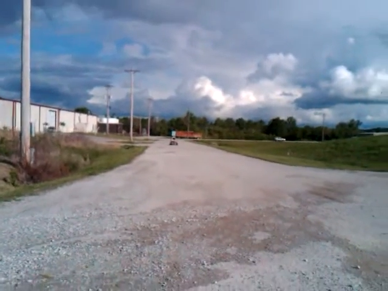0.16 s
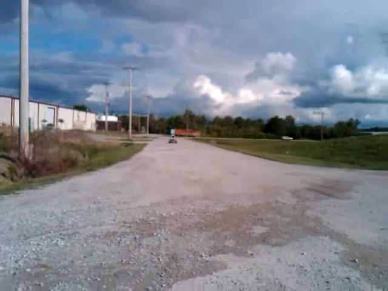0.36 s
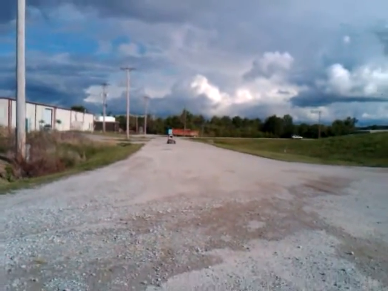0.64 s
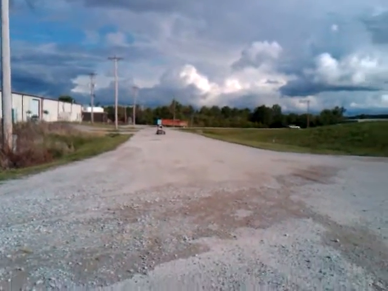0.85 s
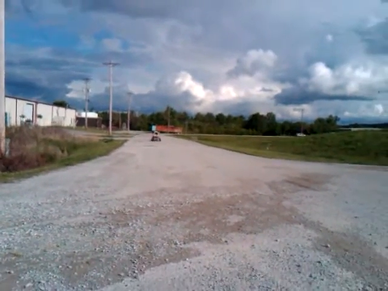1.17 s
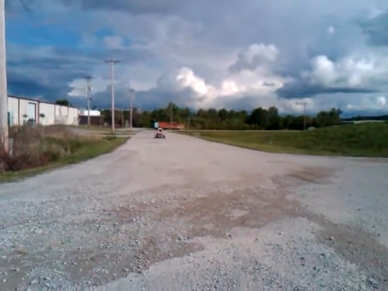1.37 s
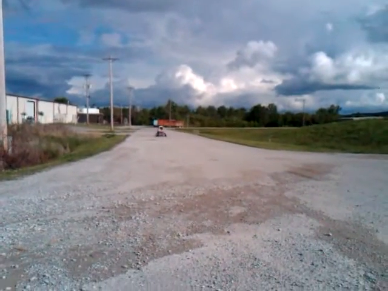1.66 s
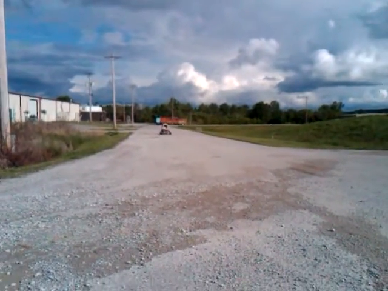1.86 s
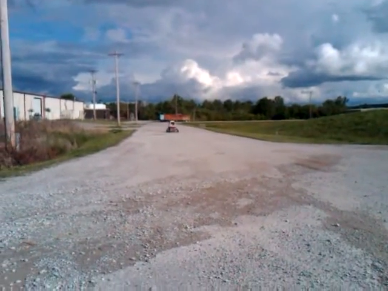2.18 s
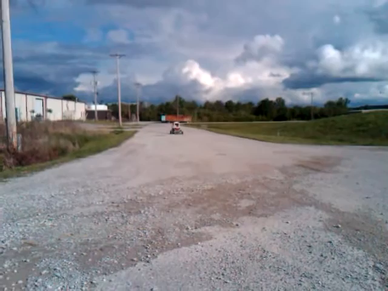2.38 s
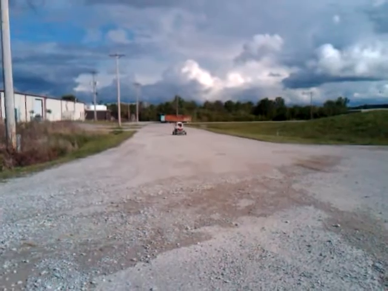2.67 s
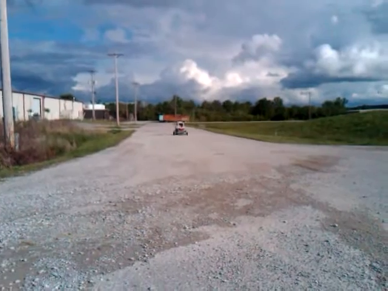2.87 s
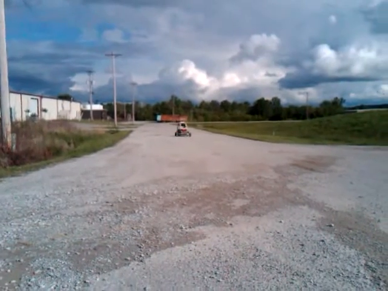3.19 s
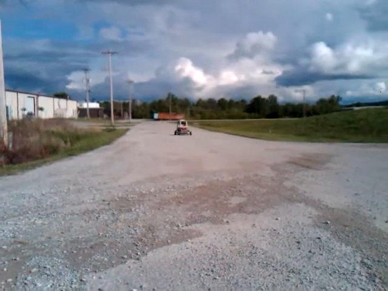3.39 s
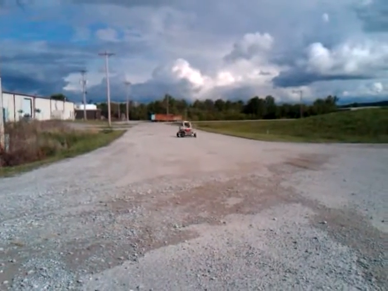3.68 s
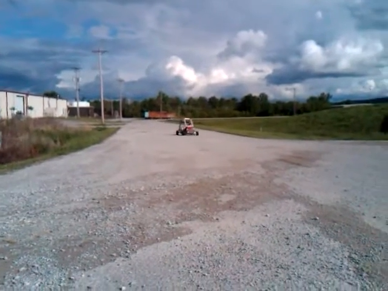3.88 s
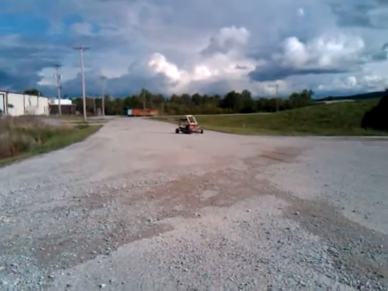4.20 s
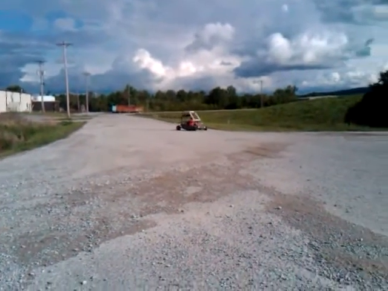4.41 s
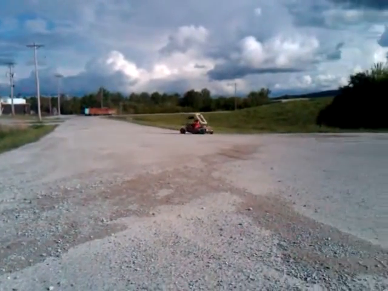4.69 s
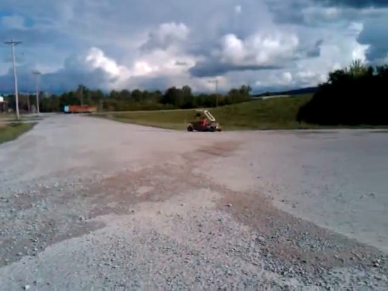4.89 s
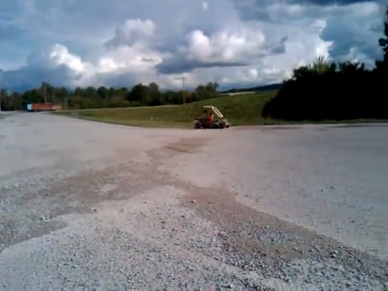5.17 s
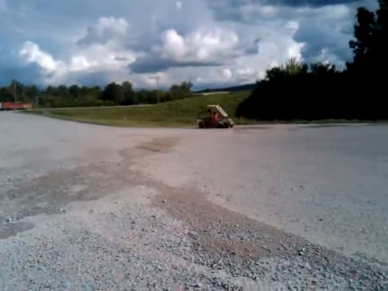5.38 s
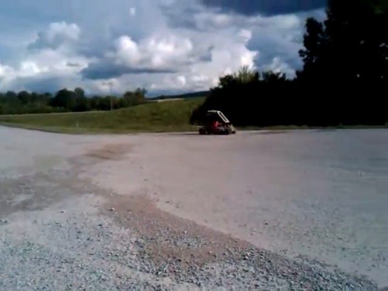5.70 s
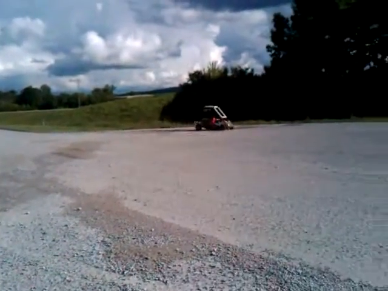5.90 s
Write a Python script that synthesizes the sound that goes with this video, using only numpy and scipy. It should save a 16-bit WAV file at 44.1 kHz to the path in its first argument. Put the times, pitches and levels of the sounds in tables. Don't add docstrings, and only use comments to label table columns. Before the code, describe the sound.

Outdoors on gravel, a distant kart putters toward a cheap, muffled microphone in a light buffeting breeze. The low thumping exhaust has a sharp front edge and a hollow ring. After a short ragged lift it drives on, turning side-on with metallic knocks and gravelly fizz rising around the engine. At the end it coasts, misfiring and popping, with rattling tinware and a faint wavering clutch whistle.

```python
import sys
import numpy as np
from scipy import signal
from scipy.io import wavfile
from scipy.ndimage import uniform_filter1d

SR = 44100
rng = np.random.default_rng(int(sys.argv[2]) if len(sys.argv) > 2 else 0)


def voltage_ratio(level):
    return 10 ** (np.asarray(level, float) / 20)


def to_wav(sig):
    pcm = np.clip(np.atleast_2d(sig), -1, 1) * 32767
    pcm = np.round(pcm).astype(np.int16)
    wavfile.write(sys.argv[1], SR, pcm.T)


N = 266805


def evened(x):
    return x / np.sqrt(np.mean(x ** 2) + 1e-20)


def curve(rows, t):
    s, *columns = np.transpose(rows)
    return [np.interp(t, s, c) for c in columns]


def step(u):
    return .5 + .5 * np.tanh(u / 2)


def bell(t, centre, half_length):
    return np.exp(-((t - centre) / half_length) ** 2)


def add(mix, s, sound):
    part = mix[round(s * SR):][:len(sound)]
    part += sound[:len(part)]


def noise(points, patchy_db, size=512):
    hz = np.fft.rfftfreq(size, 1 / SR)
    f, db = np.transpose(points)
    a, b, patch = rng.standard_normal((4 * N // size + 5, len(hz), 3)).T
    patch = uniform_filter1d(patch, size=5, axis=0)
    patch = evened(uniform_filter1d(patch, size=16, axis=1))
    colour_db = np.interp(np.log(hz + 1), np.log(f + 1), db, right=-120)
    spectra = (a + 1j * b) * voltage_ratio(colour_db[:, None] + patchy_db * patch)
    return evened(signal.istft(spectra, nperseg=size, noverlap=3 * size // 4)[1][:N])


def resonance(x, hz, width):
    turn = np.exp(2j * np.pi * np.cumsum(hz) / SR)
    r = np.exp(-np.pi * width / SR)
    return 2 * (turn * signal.lfilter([(1 - r) ** 2], [1, -2 * r, r * r], x / turn)).real


def resonant(x, modes, drift):
    shift = curve(drift, np.arange(N) / SR)[0]
    return evened(sum(voltage_ratio(db) * resonance(x, hz * shift, 1.51 * width) for hz, width, db in modes))


def puffs(times, db, rise_ms, fall_ms, lag_ms):
    ms, out = np.arange(2000) / SR * 1000, np.zeros(N)
    shape = np.exp(-ms / fall_ms) * (1 - np.exp(-ms / rise_ms)) ** 3
    for s, gain in zip(times, voltage_ratio(db)):
        add(out, s + lag_ms / 1000, gain * shape / shape.max())
    return out


def rings(rows, over_db, ring_ms):
    ms, out = np.arange(1500) / SR * 1000, np.zeros(N)
    flutter = uniform_filter1d(rng.standard_normal((len(rows), 2, len(ms))), size=40, axis=2)
    for (s, db, hz), (a, b) in zip(rows, flutter / flutter.std()):
        turn, u = 2 * np.pi * hz * ms / 1000, ms / ring_ms
        tone = (1 + .5 * a) * np.sin(turn) + .5 * b * np.cos(turn)
        rise = np.sin(np.minimum(u, np.pi / 2)) ** 2
        add(out, s, voltage_ratio(db + over_db) * rise * np.exp(1 - u) * tone)
    return out


# (time [s], pitch factor)
APPROACH = [(0, 1.02), (.35, 1.025), (1.2, 1.037), (2.5, 1.028), (3.8, 1.019), (5, 0.96), (6.05, 1.04)]


def facing(t):
    return np.clip((curve(APPROACH, t)[0] - 1) / .035, 0, 1)


# (from [s], to [s])
LIFTS = [
    (2.86, 3.39),
    (5.49, 7),
]


def lifted(t):
    return sum(step((t - a) / .015) - step((t - b) / .015) for a, b in LIFTS)


# (time [s], firing rate [1/s])
SPEED = [(0, 20.869), (.5, 22.028), (1.1, 23.018), (1.8, 23.895), (2.4, 24.28), (2.85, 23.502),
         (3.1, 22.47), (3.4, 22.196), (4.1, 21.411), (4.7, 21.023), (5.5, 21.256)]


def turns():
    first_s = .0244
    total = np.cumsum(curve(SPEED, np.arange(N) / SR)[0]) / SR
    return total - total[round(first_s * SR)]


# (time [s], exhaust [dB], running gear on gravel [dB])
NEAR = [(0, -39.5, -51), (.45, -36.5, -50), (1.0, -36, -50), (1.35, -33.5, -49), (1.65, -32.5, -45.5),
        (2.3, -30, -44.5), (2.8, -29.5, -45), (3.4, -28, -47.5), (3.75, -28.5, -43.5), (4.2, -25.5, -41),
        (4.35, -28.5, -39), (4.7, -25.5, -36), (4.95, -24, -37.5), (5.35, -25, -33), (5.5, -25, -35),
        (5.8, -22, -31), (6.05, -26, -33)]
# (time [s], thump [dB], pipe ring [dB], unburnt share [0-1])
RAGGED = [(2.8783, -38.5, -23.5, 0), (2.925, -61, -29, 0.06), (2.963, -34.5, -21, 0.03),
          (3.0052, -46, -19, 0.05), (3.055, -31.5, -30, 0.57), (3.1022, -30.5, -30, 0.96),
          (3.1385, -30, -17, 0.18), (3.1858, -30.5, -20, 0.25), (3.234, -58, -35.5, 0.9),
          (3.273, -41.5, -26.5, 0.32), (3.3219, -31, -23.5, 0.55), (3.365, -51, -18.5, 0.14),
          (5.518, -24.5, -20, 0.57), (5.5723, -25.5, -26.5, 0.97), (5.6135, -25, -19.5, 0.51),
          (5.6606, -61, -24.5, 0.6), (5.7194, -25.5, -23, 1), (5.758, -21, -14.5, 0.19),
          (5.8141, -27, -25, 0.94), (5.8618, -26, -19.5, 0.67), (5.9135, -39, -37, 0.4),
          (5.9691, -28.5, -23, 0.98), (6.0144, -27, -13.5, 0)]


def firings():
    t, count = np.arange(N) / SR, turns()
    held = np.interp(np.arange(int(count[-1])), count, t)
    held = held[np.all([(held < a) | (held > b) for a, b in LIFTS], axis=0)]
    thump_db, gear_db = curve(NEAR, held)
    pull = (curve(SPEED, held + .25)[0] - curve(SPEED, held - .25)[0]) * 2
    ring_db = thump_db + 5.5
    crack_db = thump_db + 5.5 + 3.5 * facing(held) + 0.92 * pull - 4.5 * lifted(held - .12)
    bark_db = gear_db + 0.5 + 4.5 * pull + 5 * (facing(held) - 1)
    levels = np.transpose([thump_db, ring_db, crack_db, bark_db])
    levels = levels + rng.standard_normal((len(held), 4)) * [1.3, 1.3, .9, 1.2]
    s, thump, ring, cold = np.transpose(RAGGED)
    crack = ring - 14 - 20 * cold
    ragged = np.column_stack([s, thump, ring, crack, crack - 17.0, cold])
    rows = np.vstack([np.column_stack([held, levels, 0 * held]), ragged])
    rows = rows[np.argsort(rows[:, 0])]
    cycles = uniform_filter1d(np.gradient(rows[:, 0]), size=5, mode="nearest")
    return rows[:, 0], cycles, rows[:, 1:]


# (frequency [Hz], width [Hz], depth [0-1])
HOLLOWS = [(1120, 36, 1), (1525, 170, 0.6), (1963, 49, 1), (3873, 480, 0.4), (4410, 150, .6),
           (5380, 470, 0.5), (6580, 160, .85)]
# (time [s], frequency factor)
HOLLOW_DRIFT = [(0, 1.02), (1.5, 0.97), (3.5, 1.012), (6.05, 1.007)]


def ground(x):
    shift = curve(HOLLOW_DRIFT, np.arange(N) / SR)[0]
    return x - sum(depth * resonance(x, hz * shift, width) for hz, width, depth in HOLLOWS)


def gravel():
    size = voltage_ratio(4.0 * np.minimum(rng.exponential(1, N), 3.5))
    stones = (rng.random(N) < 2500 / SR) * size * rng.choice([-1, 1], N)
    return 0.69 * evened(stones) + noise([(300, 0.017), (6000, 0.0044)], patchy_db=2.0)


# (time [s], level over the steady rattle [dB])
BUMPS = [(0.492, -4), (1.498, -5), (3.155, -1), (3.96, -3), (4.242, -6), (4.32, -5), (4.57, -6),
         (4.62, -15), (4.672, -0.5), (4.699, -9.5), (4.76, -3.5), (4.796, 0), (4.861, -14), (5.043, -10),
         (5.095, -16), (5.211, -2), (5.231, 0), (5.283, -10), (5.336, -6.5), (5.38, -10), (5.596, -3),
         (5.784, -3), (5.821, -10), (6.04, 0)]


def clattering():
    t, half_s = np.arange(N) / SR, 0.0083
    return 1 + sum(voltage_ratio(db) * bell(t, s, half_s) for s, db in BUMPS)


# (frequency [Hz], width [Hz], level [dB])
RATTLE = [(967, 130, 2), (1278, 176, 3.5), (1732, 165, 3), (2190, 243, -3), (2415, 450, -1.5),
          (2760, 180, -8), (3180, 91, -10.5)]
# (centre [s], half length [s], gain [dB])
TIN_SWELL = (4.72, .3, 4)


def tinware(drive, motion, squeeze, spit, leaving):
    t = np.arange(N) / SR
    centre_s, half_s, swell_db = TIN_SWELL
    panel = voltage_ratio(swell_db * bell(t, centre_s, half_s))
    sheen = voltage_ratio(-6.5 + 6 * facing(t) + leaving)
    body = resonant(drive, RATTLE[:2], HOLLOW_DRIFT) * (motion + 0.71 * squeeze)
    side = resonant(drive, RATTLE[2:4], HOLLOW_DRIFT) * (motion + 0.12 * squeeze) ** 0.83
    bright = resonant(drive, RATTLE[4:], APPROACH) * (motion + .3 * spit)
    return evened(body + 0.81 * panel * side + sheen * bright)


# (frequency [Hz], density [dB per Hz])
FIZZ = [(1940, -28), (3300, -13), (3890, -12.5), (4900, -15.5), (5950, -15.5), (7160, -18), (7600, -41.5),
        (9880, -77)]
# (frequency [Hz], width [Hz], level [dB])
GUARDS = [(4060, 93, 1.5), (4720, 180, 4), (5040, 260, 1), (5995, 610, -2), (3715, 66, 2.5)]


def fizzing(drive, motion, clatter, leaving):
    t = np.arange(N) / SR
    guards = voltage_ratio(-3 + 2.4 * leaving) * resonant(drive, GUARDS, HOLLOW_DRIFT)
    fizz = noise(FIZZ, patchy_db=1.5, size=256) + guards
    fizz = evened(fizz * motion ** 0.54) * clatter ** .5
    return fizz - .95 * step((t - 5.1) / 0.2) * resonance(fizz, 6600 + 0 * t, 1300)


# (frequency [Hz], density [dB per Hz])
RUMBLE = [(50, -26), (120, -5), (200, -2.5), (300, -2), (380, -6.5), (600, -5), (900, -14), (1500, -29.5)]


def running(times):
    t = np.arange(N) / SR
    rattle_db = curve(NEAR, t)[1]
    change_db = rattle_db + 45.5
    leaving = step((t - LIFTS[1][0]) / 0.03)
    fizz_db = -67.5 + 0.55 * change_db + 1.5 + 1.4 * leaving
    rumble_db = -44 + 0.62 * change_db - 3.5 * lifted(t) + 4 * leaving
    uneven_db = rng.uniform(-3.5, 3.5, len(times))
    shake_db = uneven_db - 5.5 + 5.7 * facing(times) - 2.7 * lifted(times)
    shake = 1.5 + puffs(times, shake_db, 2.0, 5.3, 0.34)
    squeeze = puffs(times, -5 + uneven_db[::-1], 2.9, 6.4, 28)
    spit_db = 6 - 11.5 * facing(times) + uneven_db - 12 * lifted(times)
    spit = puffs(times, spit_db, 0.96, 11.0, 0.92)
    seating = puffs(times, -7 + 0 * times, 0.83, 4.1, 10)
    strokes = 0.23 * squeeze + seating
    clatter, drive = clattering(), gravel()
    rattle = tinware(drive, shake + strokes, squeeze, spit, leaving) * clatter
    fizz = fizzing(drive, shake + strokes / 2 + spit, clatter, leaving)
    rumble = evened(noise(RUMBLE, patchy_db=-2.5, size=1024) * shake ** 1.66) * clatter ** .5
    return voltage_ratio(rattle_db - 3.5) * rattle + voltage_ratio(fizz_db) * fizz + voltage_ratio(rumble_db) * rumble


# (frequency [Hz], density [dB per Hz])
WIND = [(10, -9), (30, -6), (60, -2.5), (120, -9), (300, -52)]
# (time [s], peak [dB], frequency [Hz])
GUSTS = [(1.645, -31.5, 43.8), (1.828, -54, 30), (2.098, -46, 45), (3.02, -50, 34.46), (4.107, -58, 45.4),
         (4.635, -41.5, 40), (4.798, -30, 40), (5.557, -44, 54.4), (5.901, -39, 30)]
# (time [s], peak [dB])
TICKS = [(.0688, -37), (.343, -35)]


def wind():
    out = voltage_ratio(-69.5) * noise(WIND, patchy_db=7.5, size=2048)
    u = np.linspace(-1, 1, 3000)
    for s, db, hz in GUSTS:
        thud = bell(u, 0, 0.12) * np.sin(2 * np.pi * hz * u * 1500 / SR + 1.1)
        add(out, s - 1500 / SR, voltage_ratio(db) * thud)
    ms = np.arange(300) / SR * 1000
    for s, db in TICKS:
        grain = np.sin(2 * np.pi * 4.6 * ms) * rng.uniform(-.8, 1.2, len(ms)) * np.exp(-ms / 1.3)
        add(out, s, voltage_ratio(db + 6.0) * grain)
    return out


def exhaust(times, cycles, levels):
    ms = np.arange(-130, 3500)[None] / SR * 1000
    cycles, shift = cycles[:, None], curve(APPROACH, times)[0][:, None]
    coast, front_on = lifted(times)[:, None], facing(times)[:, None]
    thump, ring, crack = voltage_ratio(levels[:, :3]).T[:, :, None]
    cold = np.clip(levels[:, 4:], 0, 1)

    def bump(at, wide):
        return np.exp(-.5 * ((ms - at) / wide) ** 2)

    shut_ms = 218 * cycles * (1 - 0.38 * cold)
    shut = step((ms - shut_ms) / (0.62 + 0.32 * cold))
    open_hz = (160 - 22 * cold) * (21.06 * cycles) ** -.4
    shut_hz = 303 * shift * (1 - 0.13 * cold)
    pipe_hz = (open_hz + (shut_hz - open_hz) * shut) * step((ms - .45) / .14)
    phase = 2 * np.pi * np.cumsum(pipe_hz, axis=1) / SR
    ring_ms = 32 * (1 - (1 - 0.47) * coast)
    burnt = step((shut_ms + 1.2 - ms) / 2.7) + (0.31 + 2.0 * (shift - .99)) * np.exp(-ms / ring_ms)
    fade = (1 - cold) * burnt + cold * np.exp(-np.maximum(ms - shut_ms, 0) / 22)
    pipe = np.sin(phase) * (thump * (1 - shut) + ring * shut * fade)
    whine = np.sin(2 * np.pi * 640 * shift * (ms - shut_ms) / 1000)
    overtone = 0.069 * ring * shut * np.exp(-ms / 11) * whine
    front = 1.027 * crack * (0.57 * bump(0.95, 0.34) - bump(0, 0.32))
    back = -.36 * thump * (1 - cold) * (bump(4.6, 0.45) + 0.55 * bump(shut_ms + 4.2, 0.75))
    seat = (1 - coast) * thump * (0.08 + 1.23 * front_on) * bump(shut_ms + 2.4, 0.2)
    suck = -.4 * thump * cold * bump(-0.42, 0.94)
    out = np.zeros(N + SR)
    for s, sound in zip(times, pipe + overtone + front + back + seat + suck):
        add(out, s + 1 + ms[0, 0] / 1000, sound)
    return out[SR:]


def crank_tones(times):
    t = np.arange(N) / SR
    # (multiple of the firing rate, level [dB])
    orders = [(16, 2), (24, 1), (28, -.5)]
    throb = 0.64 + 0.3 * puffs(times, 0 * times, 2.8, 6.2, 4.3)
    wobble = .17 * evened(uniform_filter1d(rng.standard_normal(N), 900))
    tones = sum(voltage_ratio(db) * -np.cos(2 * np.pi * k * turns() + wobble) for k, db in orders)
    level_db = -59.5 + 8 * facing(t) + 0.1 * (curve(SPEED, t)[0] - 26)
    return voltage_ratio(level_db) * throb * tones * (1 - lifted(t))


def lot(x):
    t = np.arange(SR // 3) / SR
    taps = (rng.random(len(t)) < .04) * rng.choice([-1., 1.], len(t)) * voltage_ratio(-60 * t / 0.5) * (t > .012)
    return signal.oaconvolve(x, taps / np.linalg.norm(taps))[:N]


# (frequency [Hz], width [Hz], level [dB])
BARK = [(1741, 58, 8.5), (2190, 470, 12), (2670, 460, 4), (3030, 1100, -15.5)]
# (time [s], peak [dB], brightest frequency [Hz])
JETS = [(0.0248, -28.5, 2040), (0.0732, -29.5, 2380), (0.1215, -29.5, 2370), (0.1675, -33, 2110),
        (0.2149, -32, 2520), (0.261, -35, 1660), (0.3072, -34, 2090), (0.343, -34, 1980),
        (0.398, -36.5, 2550), (0.4454, -34.5, 2330), (0.4912, -29.5, 2650), (0.537, -39, 2550),
        (0.581, -33, 2590), (0.6265, -33, 1740), (0.672, -37, 2970), (0.7158, -38.5, 1770),
        (0.7584, -37.5, 1760), (0.8055, -35.5, 1740), (0.8502, -37, 2560), (0.8935, -32, 2870),
        (0.9378, -34, 2150), (0.9813, -38, 2380), (1.0262, -37.5, 2910), (1.068, -36.5, 2040),
        (1.1129, -32.5, 1680), (1.1558, -30, 2190), (1.1992, -33.5, 2450), (1.2434, -32, 2640),
        (1.2844, -30, 2480), (1.3279, -34.5, 2190), (1.3693, -35, 1740), (1.4137, -32.5, 2110),
        (1.4495, -40, 2040), (1.499, -31.5, 2450), (1.5406, -35, 1730), (1.5843, -34, 2020),
        (1.6262, -33.5, 1700), (1.6691, -33.5, 2220), (1.71, -36.5, 1660), (1.7534, -38, 2260),
        (1.8367, -34, 2000), (1.8781, -40, 2700), (1.9195, -39, 1640), (1.9614, -36, 2000),
        (2.0026, -35.5, 1820), (2.0444, -35, 2900), (2.0867, -32.5, 2050), (2.128, -39, 2150),
        (2.169, -33.5, 2480), (2.2104, -34.5, 2310), (2.2513, -45, 1810), (2.3337, -31, 2020),
        (2.375, -32, 2280), (2.458, -30.5, 2280), (2.499, -32, 2860), (2.582, -31.5, 2350),
        (2.6244, -36.5, 2320), (2.6653, -43.5, 2230), (2.706, -37, 3000)]


def bark(times, levels):
    s, peak_db, _ = np.transpose(JETS)
    jet_db = levels[:, 3] + 0.98 * np.interp(times, s, peak_db + 32.5, right=0)
    jet = puffs(times, jet_db + 4.5, 1.0, 1.2, .1) + puffs(times, jet_db - 10.5, 3.1, 11.0, 0.71)
    gas = resonant(rng.standard_normal(N), BARK, APPROACH)
    gas = evened(gas / (uniform_filter1d(gas ** 2, size=90) + .02) ** .4)
    lowpass = signal.butter(10, 3600, fs=SR, output="sos")
    return signal.sosfilt(lowpass, gas * jet)


def jet_rings():
    return rings(JETS, over_db=-5.5, ring_ms=1.2)


# (time [s], peak [dB], frequency [Hz])
POPS = [(2.8785, -29.5, 600), (2.920, -48, 600), (3.0082, -51, 510), (3.1384, -29.5, 573),
        (3.1917, -33, 800), (3.2277, -45, 615), (3.2696, -39, 600), (3.364, -38.5, 570), (5.5628, -33, 470),
        (5.6122, -37, 560), (5.6621, -32, 583), (5.7175, -30, 530), (5.7719, -19, 557), (5.8217, -27, 570),
        (5.8786, -31, 564)]


def pops():
    ms, out = np.arange(600) / SR * 1000, np.zeros(N)
    u = ms / 1.1
    for s, db, hz in POPS:
        tone = np.sin(2 * np.pi * hz * ms * (1 + 0.0024 * ms) / 1000)
        add(out, s - .001, -voltage_ratio(db + 8.5) * u * np.exp(-u) * tone)
    return out


# (time [s], peak [dB], frequency [Hz])
KNOCKS = [(3.4402, -46, 1280), (3.5233, -30, 1730), (3.5854, -34, 1300), (3.6294, -37, 1260),
          (3.7281, -33, 1225), (3.7725, -34, 1770), (3.806, -31, 1280), (3.9446, -32, 1365),
          (4.0954, -33, 1310), (4.1421, -35, 1320), (4.1898, -28.5, 1230), (4.2371, -36, 1263),
          (4.2639, -34, 1313), (4.29, -27, 1786), (4.3118, -30, 1280), (4.3322, -24, 1290),
          (4.3783, -23.5, 1356), (4.4255, -23.5, 1760), (4.4727, -34, 1220), (4.5093, -37, 1810),
          (4.5535, -30, 1240), (4.6156, -31.5, 1276), (4.664, -29, 1350), (4.6954, -31, 1770),
          (4.7603, -31, 1290), (4.7932, -24, 1624), (4.8495, -27, 1280), (4.8991, -27, 1273),
          (4.932, -27, 1292), (4.9488, -29.5, 970), (4.9745, -28, 1270), (4.9952, -26, 1245),
          (5.0414, -23, 1710), (5.0905, -24, 1280), (5.1236, -26, 1325), (5.1598, -29.5, 1260),
          (5.1928, -26, 1140), (5.2202, -25, 2280), (5.2811, -27, 1200), (5.325, -28, 2090),
          (5.375, -29, 1690), (5.4196, -29, 2200), (5.4733, -33, 2075), (5.521, -26, 1330),
          (5.5712, -28, 2450), (5.5968, -24, 1350), (5.6225, -31, 1180), (5.6677, -36, 1290),
          (5.6991, -29, 1290), (5.7203, -22.5, 2730), (5.7355, -23, 1270), (5.7719, -28, 1290),
          (5.8193, -27, 1300), (5.8712, -30, 1665), (5.9126, -25.5, 2270), (5.9655, -27, 1310),
          (5.9964, -21, 2225), (6.0186, -22, 1220)]


def knocks():
    return rings(KNOCKS, over_db=-7, ring_ms=4.0)


# (frequency [Hz], width [Hz], level [dB])
SQUEAL = [(4805, 18, 6), (4900, 30, 0), (5250, 110, -1), (5550, 450, -4), (3650, 50, 5), (3220, 70, 12)]
# (centre [s], half length [s])
SQUEAL_SWELL = (5.8, .17)


def squeal():
    swell = bell(np.arange(N) / SR, *SQUEAL_SWELL)
    return voltage_ratio(-52) * swell * resonant(rng.standard_normal(N), SQUEAL, [(0, 1), (7, 1)])


def scene():
    times, cycles, levels = firings()
    engine = exhaust(times, cycles, levels) + bark(times, levels) + crank_tones(times) + pops()
    kart = ground(engine + voltage_ratio(-16) * lot(engine) + running(times))
    return (kart + wind() + squeal() + jet_rings() + knocks())[None]


def starved(x):
    hz, t, z = signal.stft(x, SR, nperseg=1024)
    wide = 4
    band_hz = hz[:-1:wide]
    bands = (abs(z[:-1]) ** 2).reshape(-1, wide, len(t)).mean(1)
    usual = 1.25 * np.exp(uniform_filter1d(np.log(bands + 1e-20), size=25, axis=1))
    ceiling = np.where(band_hz[:, None] < 6300, 8, 300) * np.median(usual, axis=1, keepdims=True)
    usual = np.minimum(usual, ceiling)
    share = np.interp(band_hz, [3300, 3800, 6250, 6500, 6750, 7300], [0, .6, .62, 1.5, .9, 1.2])
    keep = np.repeat(bands > share[:, None] * usual, wide, axis=0)
    return signal.istft(z * np.vstack([keep, keep[:1]]), SR, nperseg=1024)[1][:N]


def band_limit(x):
    return signal.sosfilt(signal.butter(12, 7960, fs=SR, output="sos"), x)


def record(dry):
    band = signal.firwin(301, 7185, window=("kaiser", 8), fs=SR)
    mix = starved(signal.oaconvolve(dry[0], band, "same"))[None] + .0013
    return band_limit(mix)


dry = scene()
out = record(dry)
to_wav(out)
```